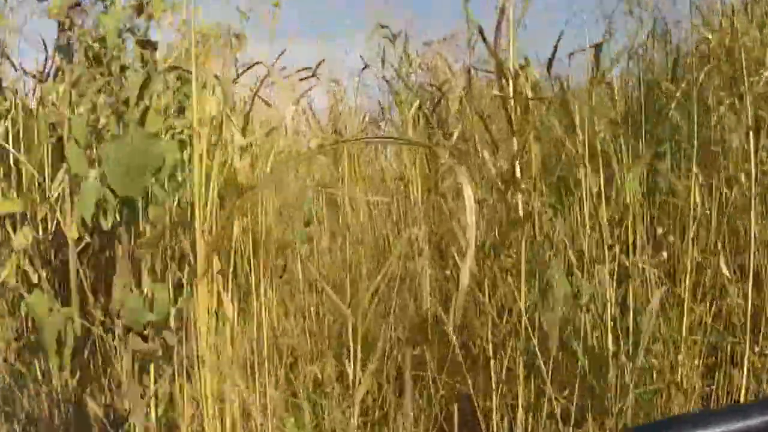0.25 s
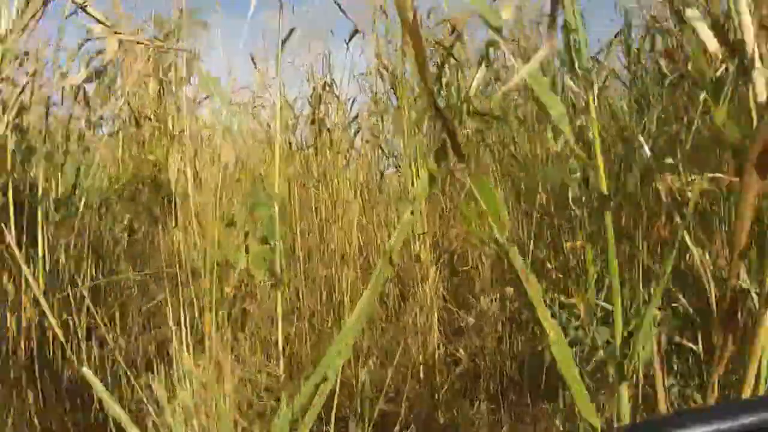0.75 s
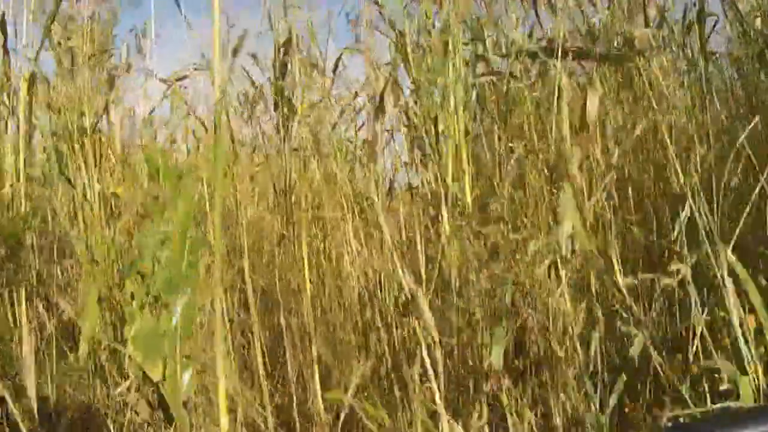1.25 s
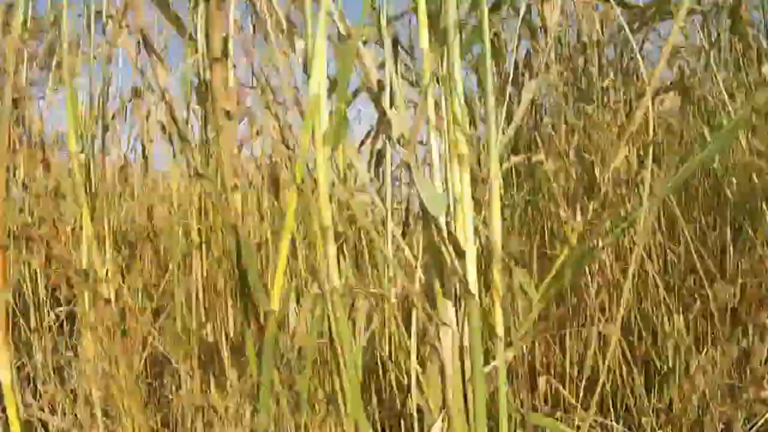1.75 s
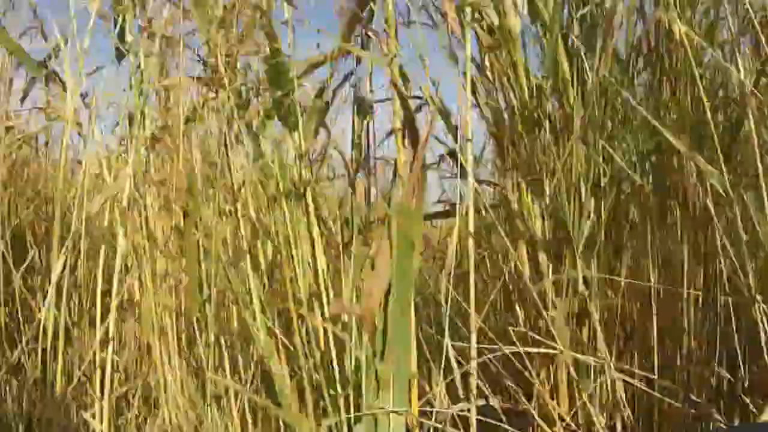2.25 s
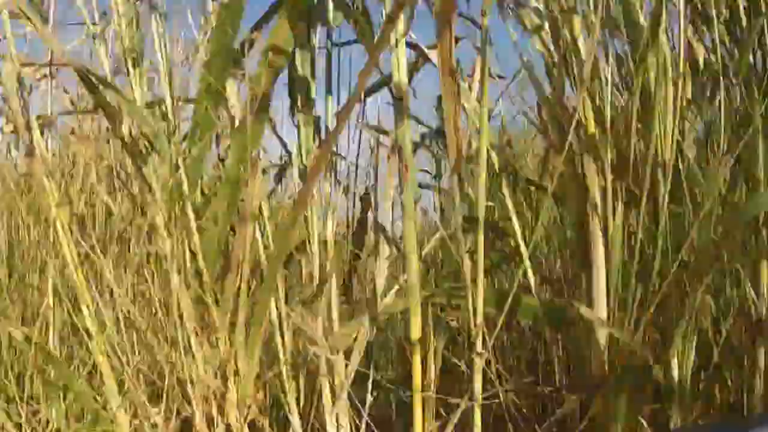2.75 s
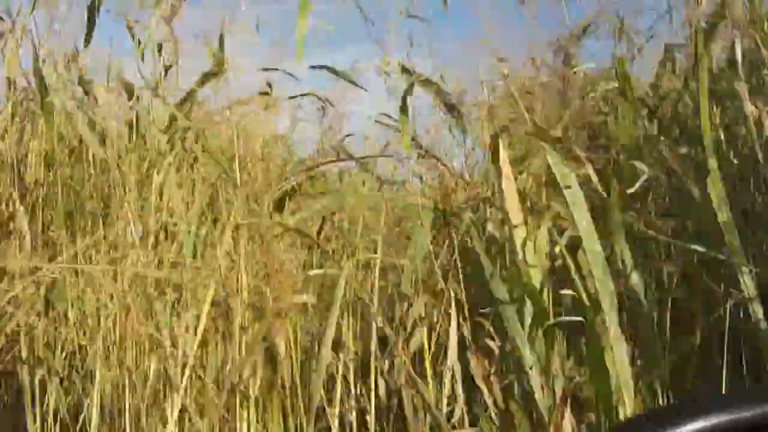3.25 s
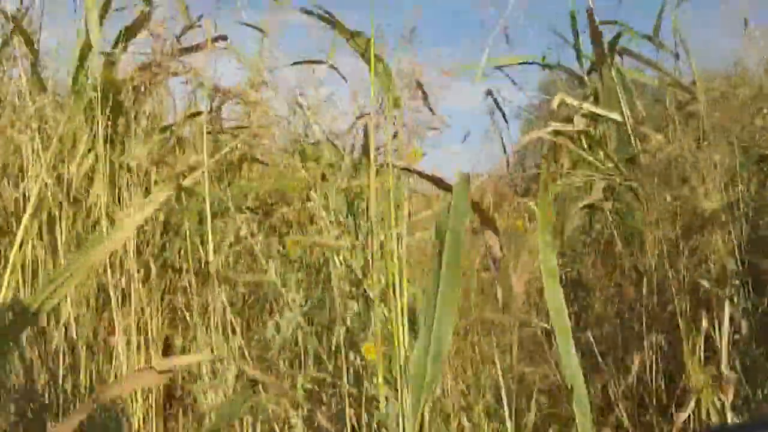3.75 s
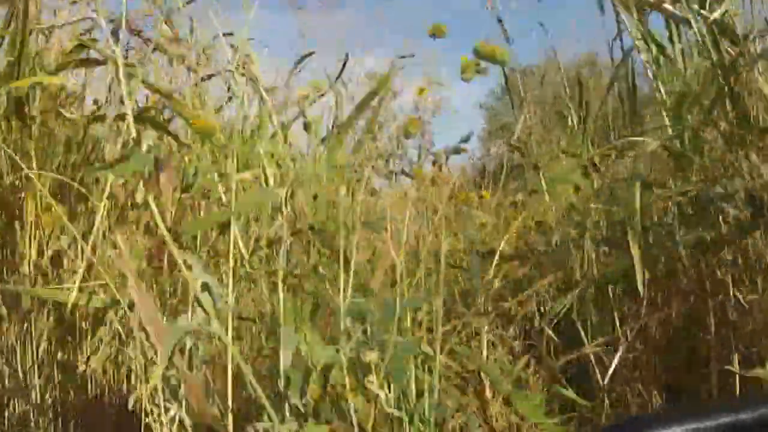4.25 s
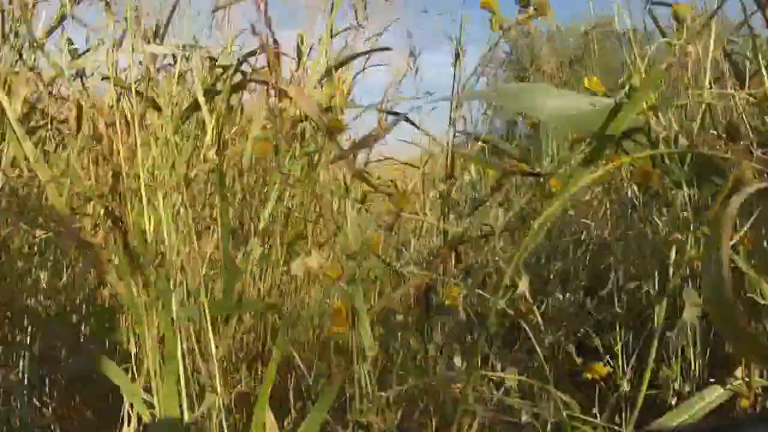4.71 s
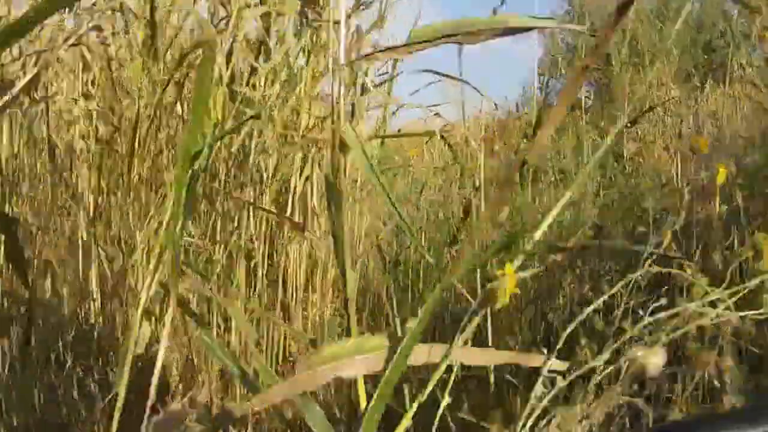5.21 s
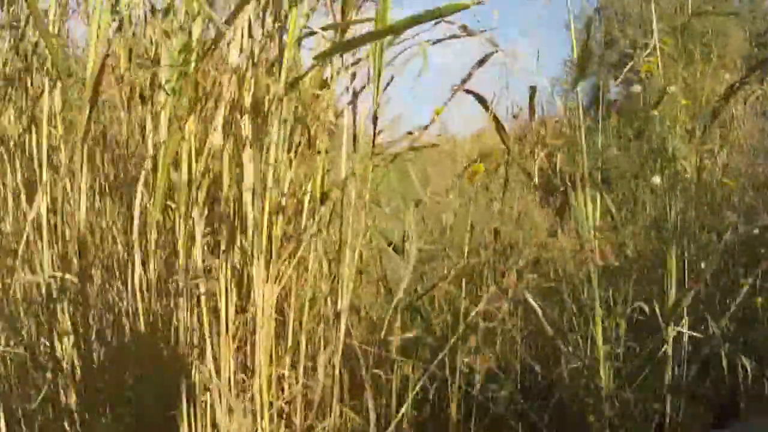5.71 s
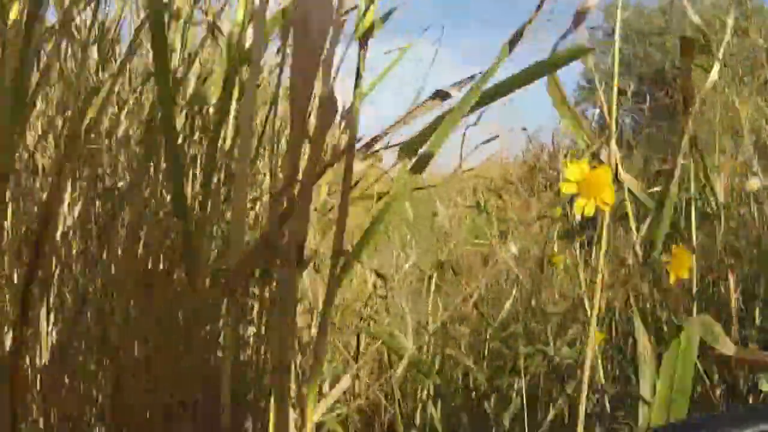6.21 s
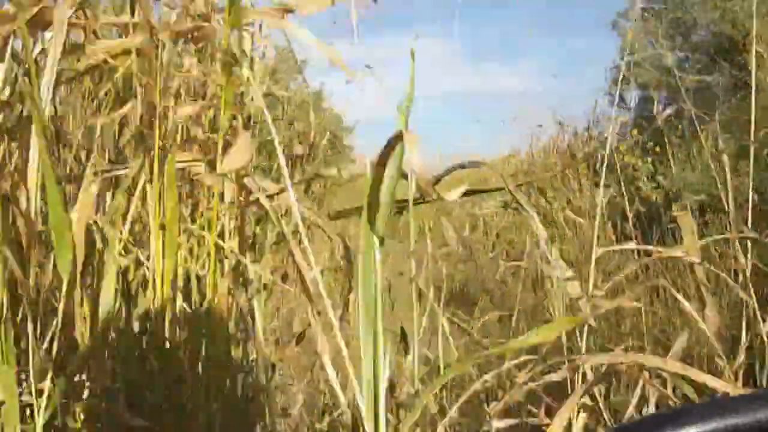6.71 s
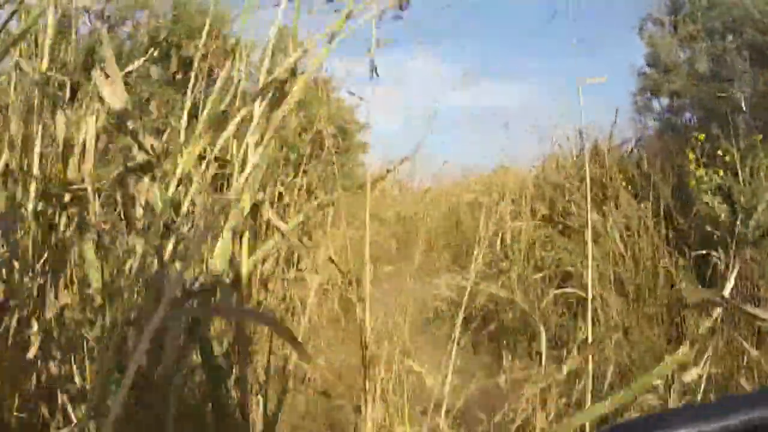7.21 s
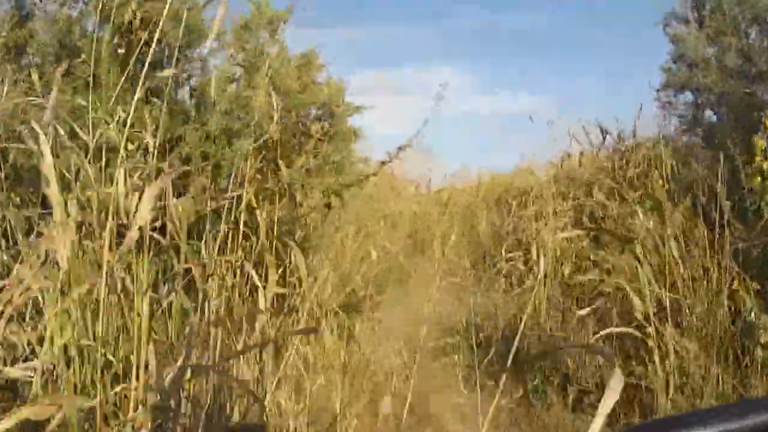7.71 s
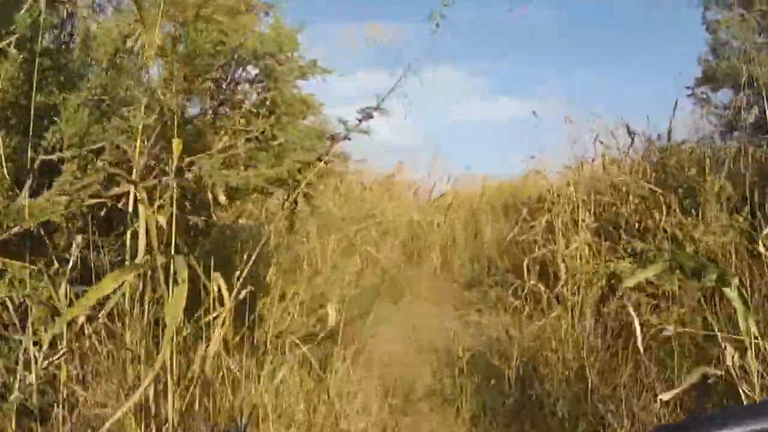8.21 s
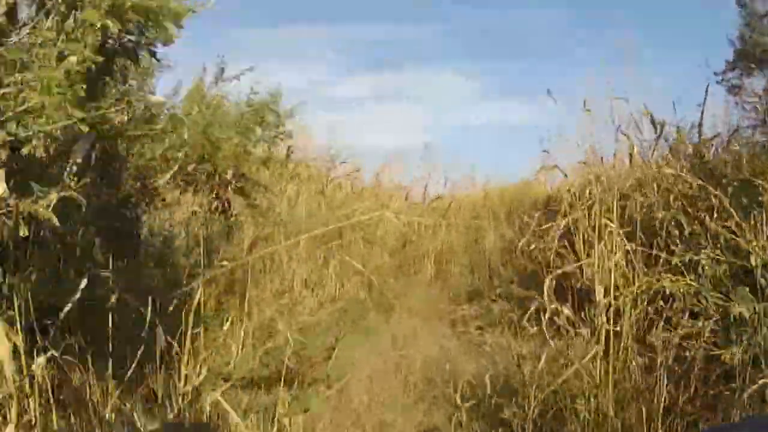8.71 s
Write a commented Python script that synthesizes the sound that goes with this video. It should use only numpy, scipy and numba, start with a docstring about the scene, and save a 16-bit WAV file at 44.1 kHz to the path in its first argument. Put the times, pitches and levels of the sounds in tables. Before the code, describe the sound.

An off-road vehicle engine drones and booms as it pushes through tall dry grass, with stalks swishing, scraping and knocking against the frame.

```python
"""Tall dry grass, heard from the frame of an off-road vehicle pushing through it.
The exhaust booms once per firing and rings in its pipe; under load the drive howls, the belt whines
and the engine clatters. Twice the engine speeds up and surges. Stalks swish, crackle and scrape
along the body, and some whip the frame; the hardest hits make a limiter duck."""
import sys
import numpy as np
from scipy import signal
from scipy.fft import rfft, irfft
from scipy.io import wavfile
from scipy.ndimage import uniform_filter1d
from numba import njit

SR = 44100
rng = np.random.default_rng(int(sys.argv[2]) if len(sys.argv) > 2 else 0)


def wav_record(signal):
    """Record a signal, one row per channel, as 16-bit PCM in the file named by sys.argv[1]."""
    frames = np.transpose(np.atleast_2d(signal))
    bounded = np.clip(frames, -1, 1)
    # unit amplitude maps onto the largest positive 16-bit level
    quanta = np.round(bounded * 32767).astype(np.int16)
    wavfile.write(sys.argv[1], SR, quanta)


N = 395136
CRUISE_HZ = 36  # firings a second; load_hz counts from here and pushes the layers' levels up or down


def from_db(db):
    """Decibels to gain."""
    return 10 ** (np.asarray(db) / 20)


def rms_one(x):
    """Scale to unit rms."""
    return x / np.sqrt(np.mean(x ** 2) + 1e-20)


def swell(middle_s, length_s):
    """A smooth bump of height 1."""
    return np.exp(-(2 * (np.arange(N) / SR - middle_s) / length_s) ** 2)


def drift(rate):
    """A smooth random wander of rms 1; the higher the rate, the faster it moves."""
    pole = np.exp(-80 * np.pi * rate / SR)
    slow = signal.lfilter([1], [1, -2 * pole, pole * pole], rng.standard_normal(N // 40 + 2002))[2000:]
    return np.interp(np.arange(N) / 40, np.arange(len(slow)), rms_one(slow))


def band(x, low_hz, high_hz):
    """Causal band-pass."""
    edges = np.clip([low_hz, high_hz], 10, .47 * SR)
    return signal.sosfilt(signal.butter(2, edges, "band", fs=SR, output="sos"), x + 1e-18)


def resonate(x, modes):
    """Parallel resonances, scaled to rms 1. Each mode: centre in Hz, width in Hz, relative gain in dB."""
    return rms_one(sum(from_db(db) * band(x, hz - width / 2, hz + width / 2) for hz, width, db in modes))


def grains(per_s, spread_db):
    """Random clicks of very unequal size."""
    sizes = from_db(spread_db * np.minimum(rng.exponential(1, N), 5))
    return rms_one(sizes * rng.choice([-1, 1], N) * (rng.random(N) < per_s / SR))


def bursts(clicks, decay_s):
    """Each click opens a dying puff of fresh noise; rms 1."""
    envelope = signal.lfilter([1], [1, -np.exp(-1 / (decay_s * SR))], clicks + 1e-18)
    return rms_one(envelope * rng.standard_normal(N))


def splinter(clicks, decay_s):
    """Each click spreads into the same short dying burst; rms 1."""
    t = np.arange(SR // 50) / SR
    return rms_one(signal.fftconvolve(clicks, rng.standard_normal(len(t)) * np.exp(-t / decay_s))[:N])


def firings(cycles, lag, jitter_s, uneven_db, limp_db):
    """One click per cycle, `lag` of a cycle late; strong and weak alternate, and no two are alike."""
    at = np.flatnonzero(np.diff(np.floor(cycles - lag)) > 0)
    chance = rng.standard_normal((len(at), 2))
    late = (chance[:, 0] * jitter_s * SR).astype(int)
    strength_db = uneven_db * chance[:, 1] + limp_db * (-1) ** np.arange(len(at))
    clicks = np.zeros(N)
    clicks[np.clip(at + late, 0, N - 1)] = from_db(strength_db)
    return rms_one(clicks)


def puffs(cycles, lag, depth):
    """Turbulence that swells once per firing."""
    return rms_one(rng.standard_normal(N) * (1 + depth * np.cos(2 * np.pi * (cycles - lag))))


def leaves():
    """Single leaves slide past with a thin, grainy swish."""
    # Each row: middle in seconds, length in seconds, level in dB.
    passes = [(.19, 0.041, -46), (1.207, .03, -46), (1.457, 0.08, -38), (1.846, .03, -37),
              (3.513, 0.046, -52), (5.337, .045, -41)]
    touch = sum(from_db(db) * swell(s, length) for s, length, db in passes)
    return touch * rms_one(band(grains(5000, spread_db=2.0), 4600, 7400))


def grass_levels(load_hz):
    """Crackle and swish in dB: both rise with faster driving, and clumps add swells."""
    # Thick clumps. Each row: middle and length in seconds, crackle in dB, leaf swish in dB.
    clumps = [(1.2, 0.26, -31, -35), (1.504, 0.18, -23.5, -40), (1.883, 0.16, -31.5, -29),
              (2.345, 0.28, -39, -33), (3.454, 0.16, -42, -41), (4.596, 0.061, -33, -42),
              (5.343, 0.16, -29.5, -37), (5.618, 0.31, -25.5, -35), (6.82, 0.74, -34.5, -29),
              (7.567, 0.37, -38, -35.5), (8.682, 0.096, -36, -33)]
    crackle_power = from_db(-42 + load_hz) ** 2
    swish_power = from_db(-35.5 + 1.5 * load_hz) ** 2
    for s, length, crackle_db, swish_db in clumps:
        press = swell(s, length)
        crackle_power += press * from_db(crackle_db) ** 2
        swish_power += press * from_db(swish_db) ** 2
    return 10 * np.log10(crackle_power), 10 * np.log10(swish_power)


def grass(cycles, load_hz):
    """Leaves swish and snap on the body; a dry crackle ticks with the firings."""
    # The crackle's resonances. Each row: centre in Hz, width in Hz, relative gain in dB.
    crackle_modes = [(2690, 510, 10.5), (3014, 290, 6), (3656, 310, 2), (4020, 100, -9.5)]
    # The tone colour of the rustle. Each row: frequency in Hz, relative gain in dB.
    rustle_curve = [(700, 22.5), (1500, 17), (2800, -16), (3800, 1), (5000, -2), (6000, -3), (7200, -8),
                    (8500, -2), (15000, -12)]
    crackle_db, swish_db = grass_levels(load_hz)
    taps = bursts(firings(cycles, lag=.42, jitter_s=.0012, uneven_db=2.3, limp_db=1.0), decay_s=.0065)
    crackle = resonate(taps + from_db(-5) * grains(900, spread_db=3.0), crackle_modes)
    snaps_per_s = 200 * from_db(swish_db + 38.5)  # thicker growth snaps more often
    snaps = splinter(grains(snaps_per_s, spread_db=3.7), decay_s=.0013)
    brush = from_db(1.5) * snaps + rng.standard_normal(N) * from_db(4.2 * drift(36))
    hz, db = np.transpose(rustle_curve)
    bin_hz = np.arange(N // 2 + 1) * SR / N
    colour = from_db(np.interp(np.log(bin_hz + 1), np.log(hz), db))
    rustle = rms_one(band(irfft(rfft(brush) * colour, N), 910, 11600))
    return from_db(swish_db) * rustle + from_db(crackle_db) * crackle


def scrapes():
    """Stiff stalks stick and slip along the frame: dense uneven clicks that swell and fade."""
    # Each row: middle in seconds, length in seconds, level in dB.
    strokes = [(0.593, 0.018, -10), (1.432, 0.017, -12), (3.087, 0.19, -23.5), (3.408, 0.056, -28.5),
               (3.594, 0.43, -30), (4.6, 0.42, -32), (6.723, 0.044, -15), (8.67, .08, -46)]
    # The scraped frame's resonances. Each row: centre in Hz, width in Hz, relative gain in dB.
    scraped_modes = [(597, 69, 8), (1115, 440, 1.5), (2210, 350, 1)]
    pressure = sum(from_db(db) * swell(s, length) for s, length, db in strokes)
    return pressure * resonate(grains(2500, spread_db=2.5), scraped_modes)


def knocks():
    """Stalks whip the frame: a woody crack, a thud, a ring that depends on the spot, the frame's modes."""
    # Each row: start and attack in seconds, ring level in dB, its pitch in Hz, its t60 in seconds,
    # crack in dB, thud in dB, the thud's low edge in Hz, frame level in dB.
    hits = [(1.1008, .003, -4, 1980, 0.035, -21, -8, 900, -22),
            (1.5462, 0.0018, 3, 3160, 0.008, -4.5, -8.5, 1220, -19),
            (1.733, .001, -22, 4080, 0.056, -16.5, -8, 1200, -17),
            (2.1215, .003, 3.5, 1950, .016, -28, -6, 1100, -7),
            (2.130, .003, -14, 2210, 0.035, -36, -9, 1200, -10),
            (2.802, .001, -11.5, 2690, .012, -24, -21, 1200, -26),
            (3.146, 0.0034, -21, 2170, .017, -19.5, -19, 250, -33),
            (3.383, 0.0024, -28, 2260, .06, -48, -15, 400, -28),
            (3.586, .001, -16.5, 2295, 0.055, -37, -15, 500, -23),
            (4.2435, .006, -3.5, 2344, .04, -34, -30, 1200, -32),
            (4.2955, 0.00082, -18, 2580, 0.014, -25, -37, 1200, -46),
            (4.791, 0.00137, -3, 2616, 0.01, -17, -3, 90, -24),
            (5.6813, 0.00136, 7, 2140, 0.012, -8.5, -3, 510, -18),
            (5.904, .001, -11, 2360, 0.054, -39, -22, 1200, -28),
            (6.296, 0.0026, -13, 924, .13, -32, -12, 400, -15),
            (6.9666, 0.0031, -9, 2220, 0.029, -38, -13, 900, -26),
            (7.367, .002, -10, 2640, 0.076, -19, -12, 1200, -24),
            (7.421, 0.0016, -15, 2030, .04, -44, -32, 1200, -34),
            (8.665, .001, -16, 1200, .06, -28, -24, 600, -29)]
    # The woody crack of a stalk. Each row: centre in Hz, width in Hz, relative gain in dB.
    stalk_modes = [(3130, 220, -0.5), (3350, 410, 4), (4320, 510, -2), (4990, 440, -5), (8000, 3600, -13)]
    # The struck frame's modes. Each row: pitch in Hz, relative level in dB, t60 in seconds.
    frame_modes = [(1451, -4, 0.16), (2034, -2.5, 0.065), (2261, -5, 0.25), (2665, -9, 0.11)]
    crack_t60_s, thud_t60_s, thud_width_hz = 0.033, 0.017, 1100
    out, t = np.zeros(N), np.arange(SR // 4) / SR
    for s, attack_s, ring_db, hz, t60, crack_db, thud_db, thud_hz, frame_db in hits:
        noise = rng.standard_normal((2, len(t)))
        fall = -60 * np.maximum(t - attack_s, 0)  # divided by a t60, this is the decay in dB
        ring = np.sin(2 * np.pi * hz * t) * from_db(ring_db + fall / t60)
        crack = resonate(noise[0], stalk_modes) * from_db(crack_db + fall / crack_t60_s)
        thud = rms_one(band(noise[1], thud_hz, thud_hz + thud_width_hz))
        thud *= from_db(thud_db + fall / thud_t60_s)
        frame = sum(np.sin(2 * np.pi * mode_hz * t) * from_db(frame_db + db + fall / mode_t60)
                    for mode_hz, db, mode_t60 in frame_modes)
        hit = (ring + crack + thud + frame) * np.minimum(t / attack_s, 1)
        at = int(s * SR)
        out[at:at + len(t)] += hit[:N - at]
    return out


def hums():
    """The bodywork takes up an engine overtone for a moment: a rough tone that swells and fades."""
    # Each row: middle in seconds, length in seconds, pitch in Hz, level in dB.
    notes = [(0.535, 0.052, 620, -15.5), (1.143, 0.19, 537, -17), (1.757, 0.21, 615, -19),
             (1.936, 0.08, 460, -12), (5.57, 0.18, 108, -17), (5.675, 0.092, 292, -7),
             (6.045, 0.23, 113, -14.5), (6.57, 0.18, 116, -10), (7.213, 0.81, 457, -20)]
    wobble_hz, flicker_db = 3.5, 1.8
    t = np.arange(N) / SR
    wobble = np.cumsum(wobble_hz * drift(15)) / SR
    tones = sum(from_db(db) * swell(s, length) * np.sin(2 * np.pi * (hz * t + wobble))
                for s, length, hz, db in notes)
    return tones * from_db(flicker_db * drift(25))


def belt(speed_hz, load_hz):
    """Under throttle the drive belt whines: a rough tone that arches with the engine speed."""
    hz = 1035.4 * (speed_hz / 39) ** .62 + 8 * drift(26)
    fade_db = 3 * np.minimum(load_hz - 2, 0)  # the whine dissolves as the load drops
    level_db = -29.3 + 2 * load_hz + fade_db + 2.5 * drift(30)
    return from_db(level_db) * np.sqrt(2) * np.sin(2 * np.pi * np.cumsum(hz) / SR)


def drive_howl(cycles, load_hz):
    """Firing, piston slap and valve closing shake the drive housing in turn; the intake sings along."""
    # Resonances of housing and intake. Each row: centre in Hz, width in Hz, relative gain in dB.
    housing_modes = [(449.9, 46.4, 3), (534.5, 10.4, 1), (620.6, 62.4, -0.5), (754, 148, -16.5),
                     (891.7, 19, -5.5), (1045, 82, -2.5), (1159, 37, -5), (1292, 76, -11)]
    intake_modes = [(539.4, 39, 9.6), (617, 21, 1), (1050, 146, 5.6)]
    shakes = rms_one(sum(firings(cycles, lag, jitter_s=.00015, uneven_db=2.4, limp_db=1.2)
                         for lag in (.1, .37, .58)))
    howl = resonate(shakes + from_db(-1) * puffs(cycles, lag=.35, depth=.35), housing_modes)
    sing = resonate(shakes + from_db(-6) * puffs(cycles, lag=.4, depth=.2), intake_modes)
    # the intake grows faster than the howl as the load rises
    return from_db(-22.5 + 2 * load_hz) * howl + from_db(-40.135 + 3.14 * load_hz) * sing


def clatter(cycles, load_hz, in_tune):
    """Loose parts tick on the casing and a tappet clacks, hardest where the pipe shakes the casing."""
    # The casing's resonances. Each row: centre in Hz, width in Hz, relative gain in dB.
    casing_modes = [(1468, 34, -1.5), (1949, 190, 2), (2245, 81, 10), (2426, 102, 5), (2605, 67, 3),
                    (3090, 50, -10), (3640, 84, -7.5)]
    ticks = rms_one(grains(1100, spread_db=5.5) * (1 + 0.026 * np.cos(2 * np.pi * (cycles - .45))))
    clacks = firings(cycles / 2, lag=.3, jitter_s=.0006, uneven_db=2.2, limp_db=1.0)  # every second firing
    tappet = resonate(splinter(clacks, decay_s=.004), [(2020, 140, 3.5), (2273, 300, -1.0)])
    casing = resonate(ticks + puffs(cycles, lag=0.77, depth=0.24), casing_modes)
    level_db = -28.5 + 1.82 * load_hz + 3 * in_tune
    return from_db(level_db) * (casing + from_db(-8 + 3.5 * in_tune) * tappet)


def surging():
    """Under throttle the engine speed swings up and down, building and dying away during each push."""
    # Each row: start and length in seconds, surges a second, depth in firings a second.
    pushes = [(.48, 1.51, 4.58, 1.2), (5.43, 1.57, 2.63, .62)]
    t = np.arange(N) / SR
    return sum(depth * np.sin(np.pi * np.clip((t - s) / length, 0, 1))
               * np.sin(2 * np.pi * per_s * (t - s)) for s, length, per_s, depth in pushes)


def exhaust(cycles, load_hz, pull_db, in_tune):
    """Low engine orders, and gas pulses ringing in the muffler and the pipe."""
    # Each row: multiple of the firing rate, relative level in dB.
    low_orders = [(2, -4.5), (3, 10), (4, -2.5), (5, -13)]
    # Resonances of muffler and pipe. Each row: centre in Hz, width in Hz, relative gain in dB.
    muffler_modes = [(63, 43, 4), (99, 85, -2), (156, 52, -18.5)]
    pipe_modes = [(241, 69, -13.5), (255.6, 41.6, 10.5), (286.1, 20.6, 11), (452.6, 26.5, 2)]
    orders = rms_one(sum(from_db(db + 1.6 * drift(3)) * np.sin(2 * np.pi * k * cycles)
                         for k, db in low_orders))
    # strong and weak firings alternate, so the muffler chugs at half the firing rate
    limp = firings(cycles, lag=0.186, jitter_s=0.000094, uneven_db=0.5, limp_db=2.5)
    chug = resonate(limp + puffs(cycles, lag=0.032, depth=0.49), muffler_modes)
    pulses = firings(cycles, lag=.25, jitter_s=.00013, uneven_db=1.8, limp_db=.7)
    drone = resonate(pulses + from_db(-3.0) * puffs(cycles, lag=0.3, depth=0.38), pipe_modes)
    return (from_db(-22 + 1.2 * load_hz + pull_db) * orders
            + from_db(-20 + 1.84 * load_hz + pull_db) * chug
            + from_db(-19.5 + 1.5 * load_hz + 3.5 * in_tune) * drone)


def boom(cycles, load_hz, surge_hz):
    """The exhaust's deep sine at the firing rate; it sags with each surge and dips now and then."""
    # Brief dips in level. Each row: middle in seconds, length in seconds, depth in dB.
    dips = [(0.205, 0.11, 17), (1.212, 0.09, 3.5), (1.43, 0.25, 3.5), (1.626, 0.1, 4.5), (5.933, 0.11, 5)]
    dip_db = sum(depth_db * swell(s, length) for s, length, depth_db in dips)
    level_db = -2.5 + 0.41 * load_hz - 1.5 * surge_hz - dip_db
    return from_db(level_db) * np.sqrt(2) * np.cos(2 * np.pi * cycles)


def scene():
    """The crankshaft's speed drives the engine and the grass; hums, leaves, scrapes and knocks join in."""
    # The engine's speed. Each row: time in seconds, firings a second.
    speed_curve = [(0.0, 36.64), (0.38, 35.65), (0.58, 37.7), (1.06, 39.52), (1.84, 37.7), (2.15, 37.5),
                   (2.58, 33.81), (2.99, 33.1), (3.48, 32.59), (4.92, 32.7), (5.24, 35.06), (5.87, 37.96),
                   (6.4, 39.18), (6.7, 38.94), (7.2, 35.16), (8.11, 33.38), (8.33, 34.13), (8.96, 33.45)]
    throttle_opens_s, throttle_rise_s, coasting_hz = 0.2, 0.064, 3.5
    pipe_speed_hz, pipe_range_hz = 35.54, 1.37  # the pipe drones most in this narrow range of speeds
    t = np.arange(N) / SR
    steady_hz = np.interp(t, *np.transpose(speed_curve))
    surge_hz = surging()
    cycles = .33 + np.cumsum(steady_hz + surge_hz) / SR  # one cycle per firing
    # until the throttle opens, the engine pulls as if it ran slower
    closed = .5 - .5 * np.tanh((t - throttle_opens_s) / throttle_rise_s)
    load_hz = steady_hz - CRUISE_HZ - coasting_hz * closed
    in_tune = np.exp(-((CRUISE_HZ + load_hz - pipe_speed_hz) / pipe_range_hz) ** 2)
    # the exhaust barks harder while the engine gains speed
    pull_db = 0.15 * uniform_filter1d(np.gradient(steady_hz) * SR, int(0.66 * SR))
    engine = (boom(cycles, load_hz, surge_hz) + exhaust(cycles, load_hz, pull_db, in_tune)
              + drive_howl(cycles, load_hz) + clatter(cycles, load_hz, in_tune)
              + belt(steady_hz, load_hz))
    return (engine + hums() + grass(cycles, load_hz) + leaves() + scrapes() + knocks())[None]


@njit
def limiter(x, ceiling_db, attack_db_per_s, knee_db, forget_db_per_s, release_db_per_s):
    """Gain falls while the held output peak tops the ceiling: hard hits over-duck, then it creeps back."""
    out, cut_db, peak_db = np.zeros(len(x)), 0.0, ceiling_db
    for i in range(len(x)):
        out[i] = x[i] * 10 ** (-cut_db / 20)
        peak_db = max(20 * np.log10(abs(out[i]) + 1e-9), peak_db - forget_db_per_s / SR)
        push = attack_db_per_s * np.tanh(max(peak_db - ceiling_db, 0.0) / knee_db)
        cut_db = max(cut_db + (push - release_db_per_s) / SR, 0.0)
    return out


def record(dry):
    """A limiter, then overshoots are clipped; a thin sizzle mirrors the sound around a high frequency."""
    mirror_hz, cutoff_hz = 12000, 15300
    held = limiter(dry[0], ceiling_db=-0.2, attack_db_per_s=2700., knee_db=2.8,
                   forget_db_per_s=950., release_db_per_s=56.)[None]
    clipped = .98 * held / (1 + held ** 16) ** (1 / 16)
    dulled = signal.sosfilt(signal.butter(2, 4500, fs=SR, output="sos"), clipped)
    carrier = np.cos(2 * np.pi * mirror_hz * np.arange(N) / SR)
    sizzle = from_db(5.5) * np.gradient(dulled, axis=-1) * carrier
    sizzle = signal.sosfilt(signal.butter(1, 13000, fs=SR, output="sos"), sizzle)
    return signal.sosfilt(signal.ellip(10, .1, 80, cutoff_hz, fs=SR, output="sos"), clipped + sizzle)


dry = scene()
out = record(dry)
wav_record(out)
```